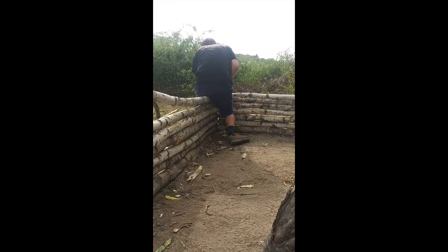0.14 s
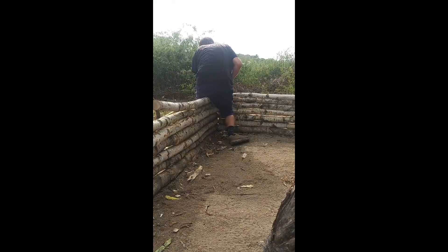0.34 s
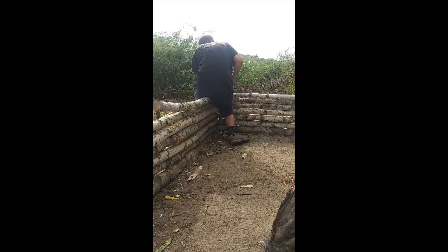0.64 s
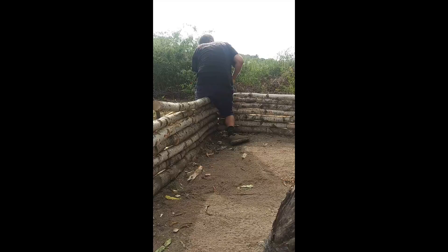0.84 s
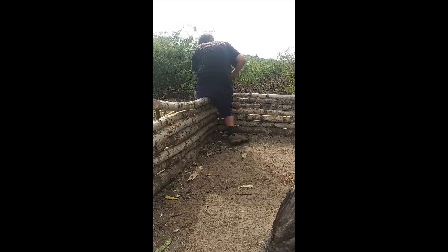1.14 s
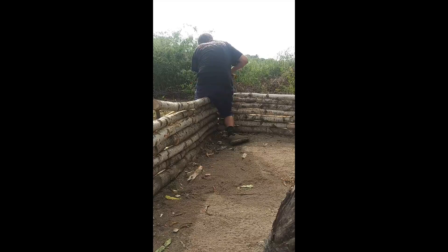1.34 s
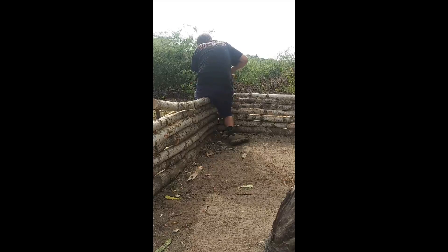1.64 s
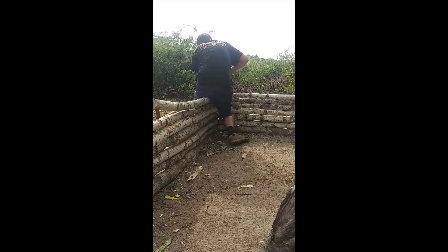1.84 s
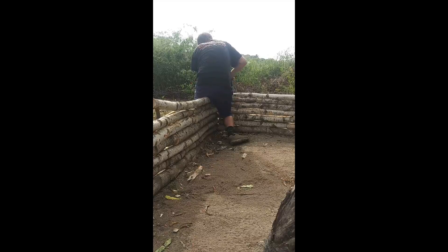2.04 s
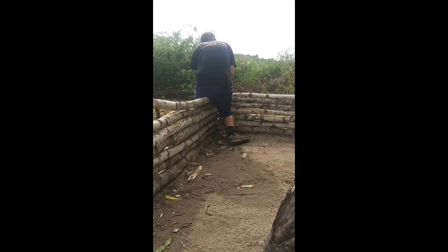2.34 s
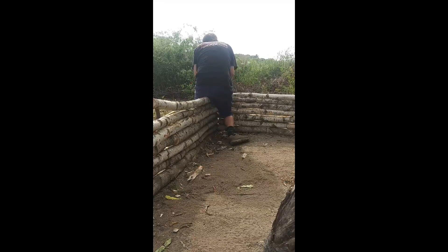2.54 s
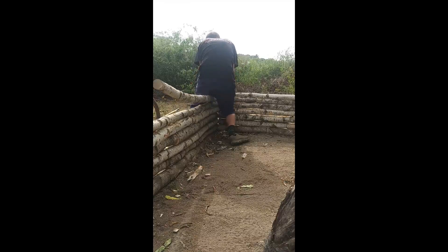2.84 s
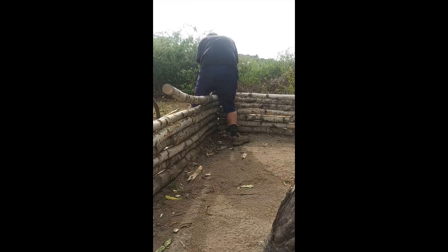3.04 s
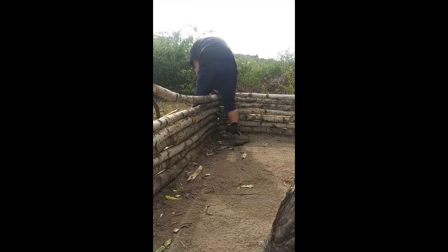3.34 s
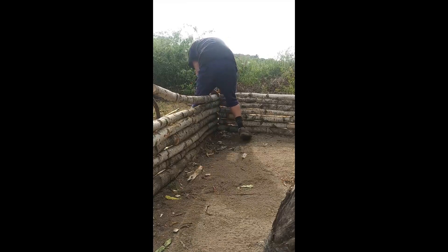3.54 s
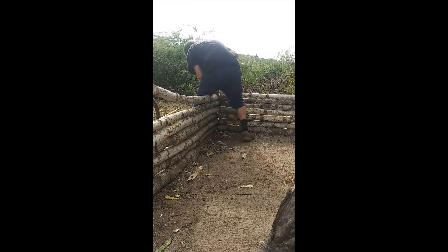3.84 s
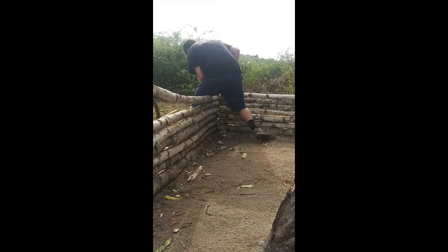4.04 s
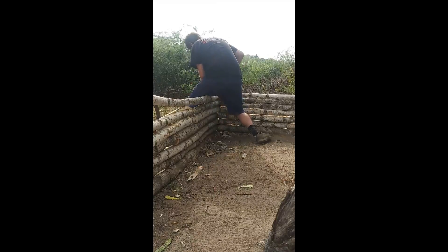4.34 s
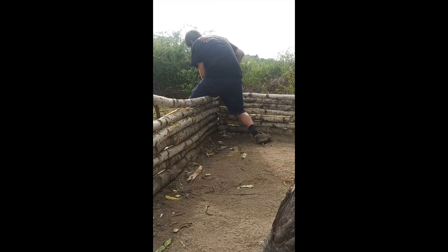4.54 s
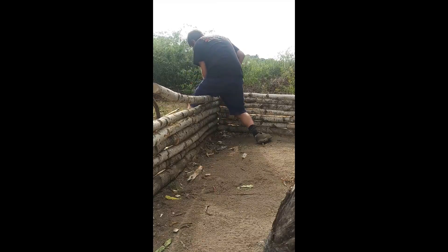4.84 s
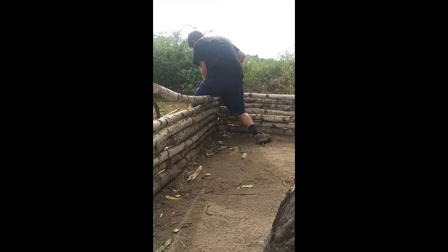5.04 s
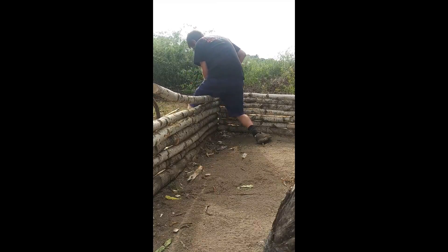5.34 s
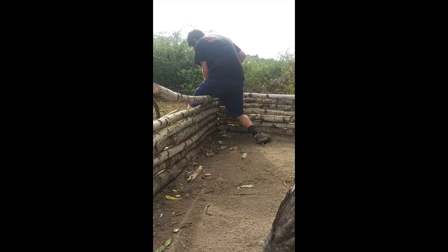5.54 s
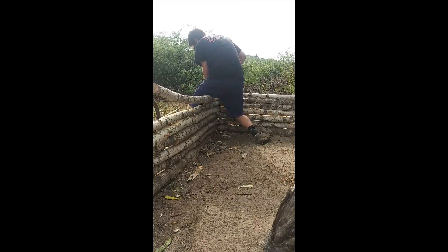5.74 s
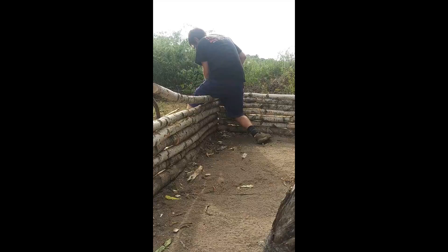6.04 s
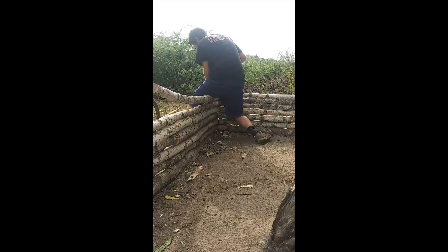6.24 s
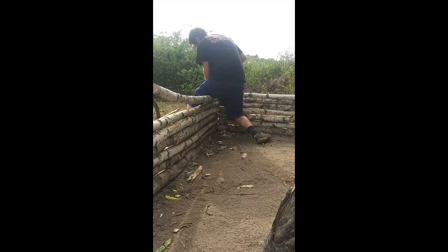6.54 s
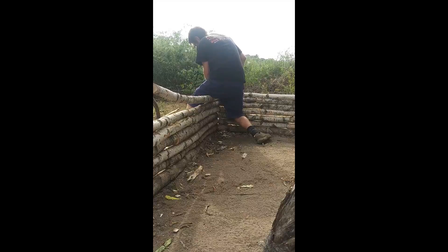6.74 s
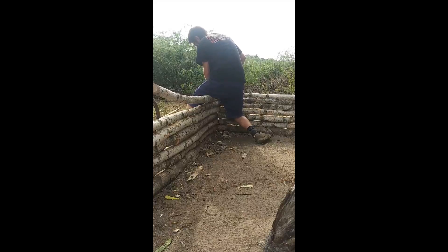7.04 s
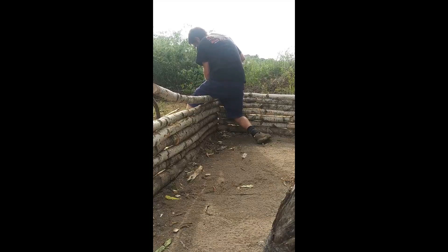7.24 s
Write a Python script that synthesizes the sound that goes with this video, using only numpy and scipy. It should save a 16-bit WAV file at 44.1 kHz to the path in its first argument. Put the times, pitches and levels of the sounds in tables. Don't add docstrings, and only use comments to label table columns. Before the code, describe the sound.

A hammer knocks hard on a stacked log wall, three blows, a pause with boot scuffs, then six quick regular blows, over steady chirring crickets.

```python
import sys
import numpy as np
from scipy import signal
from scipy.fft import rfft, irfft, next_fast_len
from scipy.io import wavfile
from scipy.ndimage import uniform_filter1d

SR = 44100
rng = np.random.default_rng(int(sys.argv[2]) if len(sys.argv) > 2 else 0)


def materialize(psi):
    bounded = np.clip(np.atleast_2d(psi).T, -1, 1)
    quanta = np.round(bounded * 32767).astype(np.int16)
    wavfile.write(sys.argv[1], SR, quanta)


def voltage_ratio(level):
    return 10 ** (np.asarray(level, float) / 20)


N = 325898
LEAD_S = 0.01


def level(x, db):
    return x * voltage_ratio(db) / np.sqrt(np.mean(x ** 2))


def along(table, hz):
    table_hz, values = np.transpose(table)
    return np.interp(np.log(np.maximum(hz, 1)), np.log(table_hz), values)


def band(hz, width, size):
    f = np.fft.rfftfreq(size, 1 / SR)
    bell = np.exp(-((f - hz) / width) ** 2)
    return level(irfft(rfft(rng.standard_normal(size)) * bell, size), 0)


def coloured(table, size):
    gain = voltage_ratio(along(table, np.fft.rfftfreq(size, 1 / SR)))
    return level(irfft(rfft(rng.standard_normal(size)) * gain, size), 0)


def walk(rate, size):
    hold = max(int(SR / rate), 2)
    steps = np.repeat(rng.standard_normal(size // hold + 1), hold)
    return 1.1 * uniform_filter1d(uniform_filter1d(steps, hold), hold)[:size]


def swell(t, rise, t60):
    t = np.maximum(t, 0)
    return (1 - np.exp(-t / rise)) ** 2 * voltage_ratio(-60 * t / t60)


def add(out, s, x):
    i = int(s * SR)
    out[i:i + len(x)] += x[:N - i]


# start_s, knock_db, ground_thump_db, bark_crack_db, upper_modes_db
HAMMER_BLOWS = [
    (1.5894, -28.5, -39.5, -32, -7),
    (1.87, -8, -29, -21.5, -7),
    (2.112, -5.5, -28, -23, -6.5),
    (5.56, -4.5, -24, -19, -7.5),
    (5.903, -0.5, -24, -17, -6.5),
    (6.229, 1, -26.5, -14.5, -3.5),
    (6.554, 2, -26, -12, -4),
    (6.887, 2, -28, -11.5, 6.5),
    (7.21, 0.5, -23, -10, 3.3),
]


def hammer():
    out = np.zeros(N)
    t = np.arange(-441, 12288 - 441) / SR
    usual_crack_db, ring = -18, 0.91
    for s, knock_db, thump_db, crack_db, upper_db in HAMMER_BLOWS:
        seated = t - 0.0012
        snap = crack_db - usual_crack_db
        hard_db = 2.5 + 0.38 * snap
        log = voltage_ratio(knock_db) * knock(seated, hard_db, ring, upper_db)
        add(out, s - LEAD_S, log + voltage_ratio(thump_db) * thump(seated))
        wood_db = -19 + 0.75 * knock_db + 0.46 * upper_db
        wood_tilt_db = -2 + 0.24 * snap
        bark_db = -26 + 1.2 * snap
        add(out, s - LEAD_S, shake(seated, wood_db, wood_tilt_db, bark_db, -0.4, ring))
        add(out, s + 0.0026 - LEAD_S, crack(t, crack_db))
    return out + ring_on(t)


# pitch_hz, level_db, t60_s (time to fade 60 dB)
LOG_MODES = [(483, 2.5, 0.057), (606, -2.5, 0.073), (777, 9.5, 0.015), (979, -3, 0.028), (1200, -5, 0.036),
             (1433, -3, 0.043), (1645, 5, 0.023), (1790, -11.5, 0.047), (1851, 1.5, 0.028),
             (2043, -9, 0.073), (2320, -4, 0.033), (2610, -15.5, 0.041), (2800, -12.5, 0.037),
             (2950, -16, 0.027)]
# time_from_full_blow_s, level_db
CONTACTS = [
    (-.0038, -34),
    (-.0025, -17),
    (-.00125, -5.5),
    (0, 9),
    (.0075, -7),
]


def knock(t, hard_db, ring, upper_db):
    out = 0
    for (hz, db, t60), (detune, spread) in zip(LOG_MODES, rng.standard_normal((len(LOG_MODES), 2))):
        upper = np.clip(np.log2(hz / 1700) / 0.605, 0, 1)
        gain = voltage_ratio(db + hard_db * np.log2(hz / 1200) + upper_db * upper + 0.98 * spread)
        delay = 0.00213 * upper + 0.0012 * max(np.log2(772 / hz), 0)
        for contact_s, contact_db in CONTACTS:
            u = t - contact_s - delay
            onset = np.exp(np.minimum(u, 0) / 0.0003)
            decay = voltage_ratio(-60 * np.maximum(u, 0) / (t60 * ring))
            shape = np.where(u < 0, onset, decay)
            tone = np.cos(2 * np.pi * hz * (1 + 0.0075 * detune) * u)
            out = out + gain * voltage_ratio(contact_db) * shape * tone
    out = signal.sosfilt(signal.butter(2, 300, "high", fs=SR, output="sos"), out)
    return out / np.abs(out).max()


# pitch_hz, level_db (per Hz)
BARK_CRACK = [(2060, -3), (3500, -10.5), (4870, -24), (6320, -10), (6870, -4.5), (10100, -13), (10900, -33),
              (12400, -21), (16000, -46)]


def crack(t, crack_db):
    touch = voltage_ratio(-16) * swell(t + 0.004, 0.001, 0.05)
    burst = swell(t + 0.00034, 0.00014, 0.035) + touch
    steel = swell(t + 0.00039, 0.0002, 0.0069) * band(10200, 2300, len(t))
    rough_db = np.clip(3.9 * walk(900, len(t)), -9, 4.5)
    tearing = voltage_ratio(crack_db - 3 + rough_db) * burst * coloured(BARK_CRACK, len(t))
    return voltage_ratio(crack_db - 16.5) * steel + tearing


# pitch_hz, level_db (per Hz)
SHAKE_COLOUR = [(180, -29), (300, -4), (978, -3.5), (1170, -4.5), (1660, -2), (2400, -14), (2880, -16),
                (3460, -27), (5080, -16.5), (5700, -19.5), (8090, -12), (12100, -25), (16000, -46)]
# pitch_hz, t60_s
SHAKE_FADE = [(300, 0.15), (1500, 0.11), (4000, 0.23), (10000, .2)]
# pitch_hz, rise_s
SHAKE_BUILD = [(1000, 0.0034), (3000, 0.0051), (8000, 0.0066)]


def shake(t, wood_db, wood_tilt_db, bark_db, bark_tilt_db, ring):
    wood_hz = [330, 395, *np.array(LOG_MODES)[:, 0], 3200, 3550]
    bark_hz = 4000 * 2 ** (np.arange(9) / 4)
    wood = [(hz, 0.11 * hz, wood_db + wood_tilt_db * np.log2(hz / 1500)) for hz in wood_hz]
    bark = [(hz, 0.097 * hz, bark_db + bark_tilt_db * np.log2(hz / 8000)) for hz in bark_hz]
    out = 0
    for hz, width, part_db in wood + bark:
        chatter_db = 2.4 * walk(153, len(t))
        db = along(SHAKE_COLOUR, hz) + 10 * np.log10(hz / 2000) + part_db + chatter_db
        shape = swell(t, along(SHAKE_BUILD, hz), ring * along(SHAKE_FADE, hz))
        out = out + voltage_ratio(db) * shape * band(hz, width, len(t))
    return out


# pitch_hz, level_db, t60_s, rise_s
GROUND_MODES = [(94.4, -13, 0.4, 0.0067), (127.3, -7, 0.27, 0.0085), (156.6, -4, 0.27, 0.023),
                (174.3, 0, 0.15, 0.009), (193.8, -1.5, 0.19, 0.01), (216.3, -3.5, .2, 0.0033),
                (252, -3, 0.17, 0.012), (308, -16, 0.25, 0.025), (347, -2.5, 0.077, 0.0054),
                (410, -34, 0.14, 0.011), (426, -2, 0.12, 0.0081), (468, -5.5, 0.07, 0.0042)]


def thump(t, soft_db=0):
    out = 0
    landing = t - 0.023
    draws = rng.standard_normal((len(GROUND_MODES), 3))
    for (hz, db, t60, rise), (detune, spread, turn) in zip(GROUND_MODES, draws):
        phase = 2 * np.pi * hz * (1 + 0.024 * detune) * landing + 0.94 * turn
        gain = voltage_ratio(db + 2.4 * spread + soft_db * max(np.log2(hz / 300), 0))
        out = out + gain * swell(t, rise, t60) * np.cos(phase)
    return out


# start_s, level_db, pitch_hz
BLOW_RINGS = [(1.592, -38, 7260), (1.592, -43.5, 12200), (1.59, -38, 3270), (1.874, -33, 7170),
              (2.112, -31, 7000), (2.112, -42, 5960), (5.56, -29.5, 7760), (5.561, -43, 12500),
              (5.572, -21, 455), (5.907, -33, 6860), (5.906, -48, 14500), (6.231, -32, 6600),
              (6.231, -25, 10060), (6.232, -33, 11900), (6.556, -24, 5800), (6.556, -30, 1900),
              (6.558, -26, 480), (6.888, -21.5, 6320), (6.888, -19, 2830), (6.888, -20, 2540),
              (7.214, -26.5, 9300), (7.213, -29.5, 6660), (7.212, -20, 3330), (7.226, -20.5, 340)]
# pitch_hz, width_hz
RING_BLUR = [(400, 150), (2500, 360), (6500, 860), (12000, 1400)]
# pitch_hz, t60_s
RING_FADE = [(400, 0.081), (2500, 0.22), (3300, 0.046), (6300, 0.22), (12000, 0.12)]


def ring_on(t):
    out = np.zeros(N)
    for s, db, hz in BLOW_RINGS:
        t60 = along(RING_FADE, hz)
        ringing = swell(t, t60 / 40, t60) * band(hz, along(RING_BLUR, hz), len(t))
        add(out, s - LEAD_S, voltage_ratio(db) * ringing)
    return out


# start_s, level_db, pitch_hz, t60_s, wall_answer_db
BOOT_THUDS = [
    (0.614, -38, 240, 0.098, -6),
    (2.987, -39, 468, 0.11, -4),
    (3.05, -46, 129, 0.089, -20),
    (3.888, -50, 129, 0.16, -16),
    (4.185, -37.5, 156, 0.092, -10.5),
    (4.297, -48, 129, 0.079, -14),
]
# start_s, level_db, pitch_hz, length_s
BOOT_SCUFFS = [(0.887, -51, 10000, 0.015), (2.965, -42.5, 1200, 0.013), (3.03, -58, 10000, .004),
               (3.191, -46.5, 800, 0.044), (3.418, -54, 10000, 0.0037), (3.419, -51, 1800, 0.0055),
               (3.715, -43.5, 2100, 0.047), (3.73, -55, 9000, .02), (3.749, -46, 1990, 0.018),
               (3.923, -38.5, 1500, 0.012), (4.05, -44, 800, 0.023), (4.056, -50, 2800, 0.025),
               (4.262, -43.5, 1680, 0.025), (4.264, -42, 2940, 0.0098), (4.304, -44, 990, 0.0099),
               (4.474, -50, 10000, .004), (4.471, -44, 1500, 0.0052)]
# pitch_hz, width_hz
SCUFF_BREADTH = [(800, 790), (1500, 1600), (2100, 2300), (2900, 360), (10000, 4100)]


def boots():
    out = np.zeros(N)
    t = np.arange(12288) / SR
    for s, db, hz, t60, wall_db in BOOT_THUDS:
        step = voltage_ratio(db - 3.5) * swell(t, 0.0015, t60) * band(hz, 0.47 * hz, len(t))
        wall = voltage_ratio(db + wall_db) * thump(t, soft_db=-23.0)
        add(out, s, step + wall)
    for s, db, hz, length in BOOT_SCUFFS:
        grit = voltage_ratio(db + 1.7 * walk(528, len(t)))
        scrape = swell(t, length / 5, 5 * length) * band(hz, along(SCUFF_BREADTH, hz), len(t))
        add(out, s, grit * scrape)
    return out


def cricket(hz, rate, depth, blur_hz, duty, wing_hz):
    tone = np.sin(2 * np.pi * np.cumsum(hz + blur_hz * walk(220, N)) / SR)
    stroke = np.cos(2 * np.pi * np.cumsum(rate * (1 + 0.0293 * walk(3.9, N))) / SR)
    gate = 1 - depth + depth * np.clip((stroke + duty) * 1.4, 0, 1)
    wing = signal.butter(3, [hz - wing_hz, hz + 0.33 * wing_hz], "band", fs=SR, output="sos")
    return level(signal.sosfilt(wing, tone * gate * voltage_ratio(2.4 * walk(30, N))), 0)


# time_s, breeze_db, vigour_db
BREEZE_AND_VIGOUR = [(0, 0.5, 3.5), (.5, -0.5, 0), (1.3, .3, 1.3), (2.4, -1.4, .3), (3.1, 1.5, 1),
                     (3.6, 0.2, 0.5), (4.6, 0.2, 0), (4.9, 0.4, 0.5), (5.2, 1.9, -2), (6, 1.3, 2.2),
                     (6.7, 0.6, 3), (7.39, 2.2, 3)]
# pitch_hz, level_db (per Hz)
CHORUS_COLOUR = [(3400, -25.5), (3900, -19), (4300, -10.5), (4650, -26.5), (5000, -32.5), (6000, -26.5),
                 (7000, -17), (7800, -10.5), (8350, -7), (8750, -20), (9300, -32.5), (11000, -37.5),
                 (16000, -39)]
# pitch_hz, level_db (per Hz)
HUM_COLOUR = [(15, -72), (25, -58), (76, -1), (141, -3), (172, -4), (209, -8.5), (249, -11), (325, -21),
              (400, -19), (520, -36), (880, -120)]
# pitch_hz, level_db (per Hz)
DRONE_COLOUR = [(150, -13), (250, -3.5), (329, -4.5), (666, -2.5), (845, 0.5), (1400, -6), (2250, -10.5),
                (3700, -17), (4500, -9.5), (4900, -18.5), (8000, -62)]


def woods():
    s, *columns = np.transpose(BREEZE_AND_VIGOUR)
    breeze_db, vigour_db = (np.interp(np.arange(N) / SR, s, c) for c in columns)
    size = next_fast_len(N)
    high = voltage_ratio(-56.5 + vigour_db) * cricket(8342, 52.5, 0.9, blur_hz=58.8, duty=0.25, wing_hz=500)
    low = voltage_ratio(-61.5 + vigour_db) * cricket(4310, 55.5, 0.6, blur_hz=199.4, duty=0.56, wing_hz=447)
    distant = voltage_ratio(-66 + 0.76 * walk(8.6, N)) * band(2920, 440, size)[:N]
    chorus = voltage_ratio(-50.5 + 1.24 * walk(11, N)) * coloured(CHORUS_COLOUR, size)[:N]
    drone = voltage_ratio(-58.5 + breeze_db + 1.7 * walk(23, N)) * coloured(DRONE_COLOUR, size)[:N]
    hum = voltage_ratio(-60.5 + 1.6 * breeze_db + 1.95 * walk(15, N)) * coloured(HUM_COLOUR, size)[:N]
    return high + low + distant + chorus + drone + hum


def scene():
    return (hammer() + boots() + woods())[None]


def top_cut(x):
    return signal.sosfilt(signal.butter(12, 16620, fs=SR, output="sos"), x)


def record(dry):
    low_hz, top_hz, clip = 53.4, 15950, 0.8
    dry = signal.sosfilt(signal.ellip(10, 0.2, 60, top_hz, fs=SR, output="sos"), dry)
    held = dry / (1 + np.abs(dry / clip) ** 6) ** (1 / 6)
    edges = signal.butter(5, [low_hz, top_hz + 900], "band", fs=SR, output="sos")
    mix = signal.sosfilt(edges, held)
    return top_cut(mix)


dry = scene()
out = record(dry)
materialize(out)
```